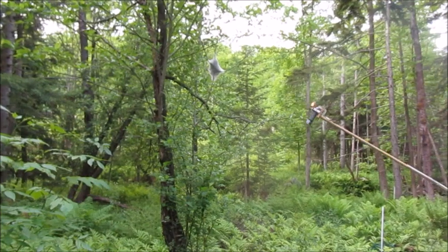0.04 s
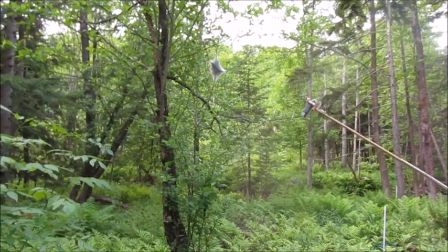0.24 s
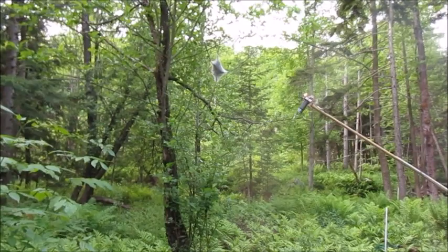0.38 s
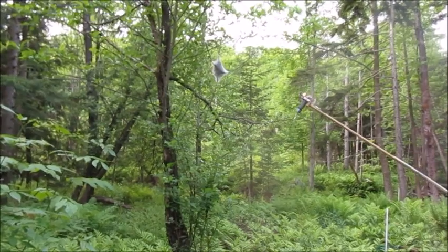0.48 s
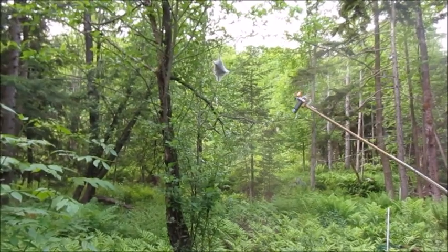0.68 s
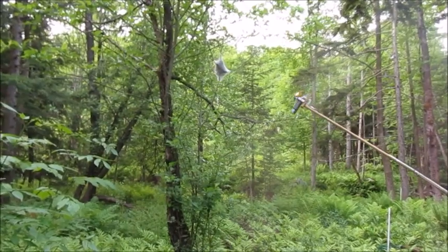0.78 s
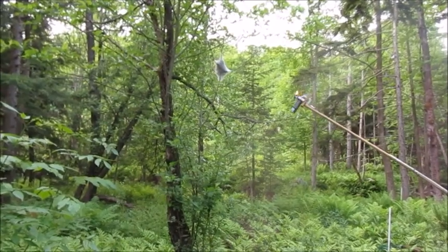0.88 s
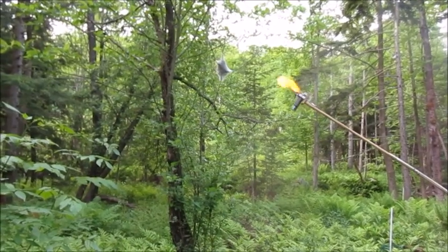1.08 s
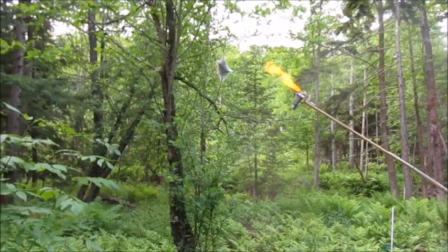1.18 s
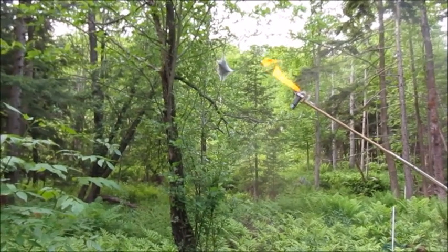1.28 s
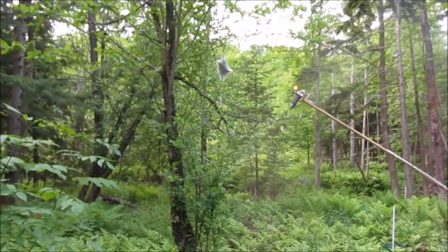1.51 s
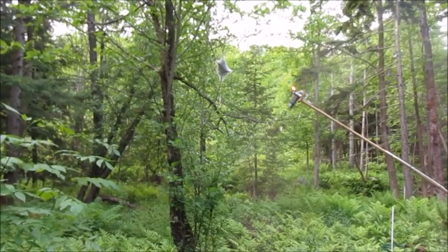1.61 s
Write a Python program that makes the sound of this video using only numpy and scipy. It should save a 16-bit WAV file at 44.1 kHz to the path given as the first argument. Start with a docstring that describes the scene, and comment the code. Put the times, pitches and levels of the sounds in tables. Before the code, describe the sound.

A gas torch fires one short burst in a quiet forest. First, nearby gear rustles and ticks, with a loud, sharp snap at 0.2 seconds and a hollow knock at 0.7. Just after 1 second, some metres off, gas hisses and flares, settling to a thinner roar that puffs out at 1.5. Soft air in the leaves and a low hum continue, with faint bird whistles around 0.7 and 1.6.

```python
"""A quiet forest, one microphone: soft air in the leaves, a low hum, faint far birds.
Close to the microphone, gear is handled: a sharp snap, soft bumps, rustles, small knocks and ticks.
Some metres off, a gas torch on a long pole fires one short burst: the valve opens, gas hisses, the flame
flares up, settles to a thinner roar and is cut off. The trees scatter a bright tail."""
import sys
import numpy as np
from scipy import signal
from scipy.fft import irfft
from scipy.io import wavfile
from scipy.ndimage import uniform_filter1d

SR = 44100
rng = np.random.default_rng(int(sys.argv[2]) if len(sys.argv) > 2 else 0)


def transcribe(signal):
    """Save signal, clipped to [-1, 1], as a 16-bit WAV file at the path in sys.argv[1]."""
    frames = np.atleast_2d(signal).T
    limited = np.clip(frames, -1, 1)
    pcm = np.round(limited * 32767).astype(np.int16)
    wavfile.write(sys.argv[1], SR, pcm)


N = 72765


def undb(db):
    """Decibels to gain."""
    return 10 ** (np.asarray(db) / 20)


def clock():
    """Time in seconds."""
    return np.arange(N) / SR


def noise(points, peaks=()):
    """Noise of rms 1 with a spectrum of (f/Hz, level/dB) points and optional peaks and dips."""
    hz = np.arange(N // 2 + 1) * SR / N
    point_hz, point_db = np.array(points).T
    curve = np.interp(np.log(hz + 1), np.log(point_hz), point_db)
    for centre, width, boost in peaks:
        curve = curve + boost * np.exp(-2 * ((hz - centre) / width) ** 2)
    y = irfft(np.exp(2j * np.pi * rng.random(len(hz))) * undb(curve), N)
    return y / y.std()


def walk(rate):
    """Smooth random wandering of spread 1, at `rate` steps a second."""
    size = max(int(SR / rate), 2)
    steps = np.repeat(rng.standard_normal(N // size + 1), size)
    y = uniform_filter1d(steps, size)[:N]
    return y / y.std()


def decay(start, t60):
    """A sudden start and an exponential fade."""
    age = clock() - start
    return (age >= 0) * np.exp(-np.log(1000) * np.maximum(age, 0) / t60)


def ring(start, modes):
    """Damped modes struck at one moment."""
    age = clock() - start
    return sum(undb(db) * decay(start, t60) * np.sin(2 * np.pi * hz * age) for hz, db, t60 in modes)


# spectrum of the air in the leaves (f/Hz, level/dB)
AIR_SPECTRUM = [(25, -12), (70, 0.5), (120, -4.5), (250, -1.5), (500, -8), (900, -6), (1700, -7),
                (3000, -12.5), (4500, -19), (8000, -23), (12000, -30.5), (15000, -37)]
# partials of the hum (f/Hz, level/dB, fade/(dB/s))
HUM_PARTIALS = [(77, -58.5, 0.5), (152.5, -53, 11.5)]
def forest(air_db=-47.5, rise_db_per_s=1.5, hum_waver=0.032):
    """All around: soft air in the leaves over a faint, wavering hum."""
    t = clock()
    air = undb(air_db + rise_db_per_s * (t - t.mean()) + .5 * walk(12.54)) * noise(AIR_SPECTRUM)
    drifting_t = t + np.cumsum(hum_waver * walk(30.3)) / SR
    hum = sum(undb(db - fade * t + 2 * walk(15.1)) * np.sqrt(2) * np.sin(2 * np.pi * hz * drifting_t)
              for hz, db, fade in HUM_PARTIALS)
    return air + hum


# bird whistles (t/s, length/s, start f/Hz, end f/Hz, level/dB, waver/share of pitch)
WHISTLES = [(0.714, 0.28, 3300, 3170, -58.5, .016), (1.55, 0.13, 3180, 2350, -54, .035)]
def birds():
    """Deep in the wood: thin, wavering whistles that fall in pitch."""
    out = 0
    for start, length, start_hz, end_hz, db, waver in WHISTLES:
        along = np.clip((clock() - start) / length, 0, 1)
        hz = (start_hz + (end_hz - start_hz) * along) * (1 + waver * walk(300))
        envelope = undb(db + 2 * walk(49)) * np.sqrt(np.abs(np.sin(np.pi * along)))
        out = out + envelope * np.sin(2 * np.pi * np.cumsum(hz) / SR)
    return out


# spectrum of the scattered tail (f/Hz, level/dB)
TAIL_SPECTRUM = [(100, -5), (1000, -12), (2200, -12), (4000, 1), (6700, 0), (9500, 4), (15000, 2)]
def trees(direct, tail_db=-14.3):
    """Trunks and leaves scatter a short, bright tail back to the microphone."""
    tail = noise(TAIL_SPECTRUM) * decay(0.0039, t60=.52)
    return undb(tail_db) * signal.fftconvolve(direct, tail / np.sqrt(np.sum(tail ** 2)))[:N]


# hollow knocks (t/s, level/dB)
KNOCK_HITS = [(0.055, -33.5), (0.7329, -22)]
# modes of the knocked body (f/Hz, level/dB, t60/s)
BODY_MODES = [(328, -10, .02), (540, -10, 0.0092), (763, 0, .011), (1030, -6, 0.0086), (1786, -8.5, 0.016),
              (2760, -11, .012)]
# spectrum of a knock's noisy splash (f/Hz, level/dB)
KNOCK_SPECTRUM = [(60, -25), (300, -2), (750, 7), (1400, -3), (2200, 2), (4500, -3.5), (9500, -2),
                  (15000, -9)]
def knocks(splash_db=-13, low_cut_hz=232):
    """Close by: the gear is knocked and rings hollow, with a splash of noise."""
    out = 0
    for start, db in KNOCK_HITS:
        splash = undb(splash_db) * decay(start, t60=0.061) * noise(KNOCK_SPECTRUM)
        out = out + undb(db) * (ring(start, BODY_MODES) + splash)
    return signal.sosfilt(signal.butter(2, low_cut_hz, "high", fs=SR, output="sos"), out)


# small ticks (t/s, level/dB, centre f/Hz, t60/s)
TICK_HITS = [(0.058, -46.5, 2960, .03), (0.0853, -35, 2070, .02), (0.0902, -37, 1550, 0.058),
             (0.111, -40.5, 4030, .012), (0.449, -42.5, 7160, 0.036), (0.4647, -39.5, 5450, 0.022),
             (0.6137, -38.5, 5650, 0.061), (0.638, -42, 4540, 0.051), (0.649, -40, 2300, .025),
             (0.699, -44.5, 4560, 0.045)]
# soft bumps (t/s, level/dB)
BUMP_HITS = [(0.172, -45), (0.4612, -33.5)]
# modes of the bumped body (f/Hz, level/dB, t60/s)
BUMP_BODY = [(71.5, 3, 0.065), (201, 1, 0.029), (430, 4.5, 0.026)]
# swells of rustling (peak t/s, level/dB, rise/s, fall/s)
RUSTLE_SWELLS = [(0.0, -45.5, .02, 0.17), (0.615, -40.5, 0.1, 0.061)]
# spectrum of the rustling (f/Hz, level/dB)
RUSTLE_SPECTRUM = [(60, -22), (160, -2.5), (290, 1.5), (550, -11), (900, 2), (1400, -3.5), (2200, 1),
                   (4000, -5.5), (8000, -10), (15000, -23)]
def handling(grain_db=1.5):
    """Close by: ticks, soft bumps and grainy rustles as the gear is moved."""
    t = clock()
    ticks = sum(undb(db) * decay(start, t60) * noise([(hz / 4, -14), (hz, 0), (hz * 4, -28)])
                for start, db, hz, t60 in TICK_HITS)
    bumps = sum(undb(db) * ring(start, BUMP_BODY) for start, db in BUMP_HITS)
    swell = sum(undb(db) * np.exp(-np.abs((t - peak) / np.where(t < peak, rise, fall)) ** 1.02)
                for peak, db, rise, fall in RUSTLE_SWELLS)
    rustle = swell * undb(grain_db * walk(400)) * noise(RUSTLE_SPECTRUM)
    return ticks + bumps + rustle


# contacts of the snapping part (t/s, level/dB)
SNAP_CONTACTS = [(0.2161, -7), (0.2185, 2.5), (0.2214, -14)]
# modes of that part (f/Hz, level/dB, t60/s)
PART_MODES = [(1186, -17, 0.038), (1494, -15.5, 0.027), (2010, -9, 0.023), (2164, -3, .025),
              (3700, -18, 0.033), (4090, -18, 0.018), (4550, -14.5, 0.023), (5220, -15.5, .018),
              (5960, -24, 0.027), (6250, -18, .018), (6624, -15, 0.021), (7700, -28, .02),
              (8200, -27, 0.018)]
# spectrum of its crack (f/Hz, level/dB)
CRACK_SPECTRUM = [(100, -18), (950, -1), (1200, 0.5), (2200, 1), (3000, -2.5), (4300, 0), (6700, 3),
                  (9500, -4), (15000, -11.5)]
def snap(start_s=.2164, ring_db=-2.5, chatter_db=-14.5, splash_db=-22.5, thud_db=-34, low_cut_hz=1059):
    """Close by: a small hard part snaps home, rings and chatters; it radiates little bass."""
    chatter = undb(chatter_db) * sum(undb(db) * decay(s, t60=0.011) for s, db in SNAP_CONTACTS)
    splash = undb(splash_db) * decay(start_s, t60=0.096)  # scattered by things nearby
    crack = (chatter + splash) * noise(CRACK_SPECTRUM)
    ringing = undb(ring_db) * ring(start_s, PART_MODES)
    thud = undb(thud_db) * ring(start_s, BODY_MODES)
    low_cut = signal.ellip(5, 1, 30, low_cut_hz, "high", fs=SR, output="sos")
    return signal.sosfilt(low_cut, ringing + crack) + thud


# spectra of the gas jet and the flame's four stages (f/Hz, level/dB)
HISS_SPECTRUM = [(300, -11), (900, 2.5), (2300, 4.5), (3500, 0.5), (6500, 0.5), (10000, -1.5), (15000, -10)]
FLARE_SPECTRUM = [(30, -18), (70, -9), (120, -3), (200, -1), (350, 2.5), (450, -2), (700, -0.5),
                  (950, -7.5), (1600, -13.5), (2700, -15.5), (4500, -32.5), (12000, -33)]
BILLOW_SPECTRUM = [(40, -35), (85, -14), (130, 1.5), (170, -2), (260, -20), (600, -28), (2000, -44)]
ROAR_SPECTRUM = [(30, -7), (70, -16), (120, -1.5), (230, -1.5), (420, -13.5), (660, 1), (850, -5),
                 (1300, -9), (2500, -12), (8000, -32)]
SNUFF_SPECTRUM = [(40, -21), (140, 2.5), (280, -6), (520, -2), (700, -10), (1200, -21), (4000, -36)]
# the flame's colour on its way through the trees (f/Hz, width/Hz, level/dB)
PATH_PEAKS = [(131, 36, 5.5), (281, 24, 7), (372, 24, 4), (451, 26, -12), (515, 26, 5), (683, 44, 10),
              (765, 27, -8), (830, 62, 2), (890, 44, -8), (1203, 70, 4.5), (1500, 58, -16)]
def torch(open_s=1.054, ignite_s=1.063, settle_s=1.13, billow_s=1.176, close_s=1.47, snuff_s=1.488):
    """Some metres off: gas hisses, flares, billows lower as the fireball grows, roars and puffs out."""
    t = clock()
    shutting = np.clip(1 - (t - close_s) / 0.038, 0, 1)
    valve = np.clip((t - open_s) / 0.021, 0, 1) * shutting
    alight = np.clip((t - ignite_s) / .018, 0, 1) * shutting
    hiss = undb(-40 + .6 * walk(78.7)) * noise(HISS_SPECTRUM)
    fade_db = 90 * np.maximum(t - settle_s, 0)  # the flare dies away and leaves the roar
    flare = undb(-26.5 - fade_db + 1.4 * walk(130)) * noise(FLARE_SPECTRUM, PATH_PEAKS)
    billow = undb(-31) * np.exp(-np.abs(t - billow_s) / .055) * noise(BILLOW_SPECTRUM)
    snuff = undb(-38) * np.exp(-((t - snuff_s) / 0.018) ** 2) * noise(SNUFF_SPECTRUM, PATH_PEAKS)
    roar = undb(-40.5 + 2 * walk(90)) * noise(ROAR_SPECTRUM, PATH_PEAKS)
    return valve * hiss + alight * (flare + billow + roar) + snuff


def scene():
    """At the microphone, in mono: near gear, the torch and far birds among the trees."""
    direct = snap() + knocks() + handling() + torch() + birds()
    return (direct + trees(direct) + forest())[None]


def record(dry, threshold_db=-14, duck_share=0.24, attack_s=0.037, recover_db_per_s=9.5, top_hz=15100):
    """The recorder clips a loud peak, turns down a little after it, recovers slowly and cuts the top."""
    recovery_db = recover_db_per_s * clock()
    wanted_cut_db = duck_share * np.maximum(20 * np.log10(np.abs(dry) + 1e-9) - threshold_db, 0)
    held_cut_db = np.maximum.accumulate(wanted_cut_db + recovery_db, axis=-1) - recovery_db
    pole = np.exp(-1 / (attack_s * SR))
    ducked = dry * undb(-signal.lfilter([1 - pole], [1, -pole], held_cut_db))
    top_cut = signal.ellip(8, .2, 70, top_hz, fs=SR, output="sos")
    return signal.sosfilt(top_cut, np.clip(ducked, -.8, .8))


dry = scene()
out = record(dry)
transcribe(out)
```